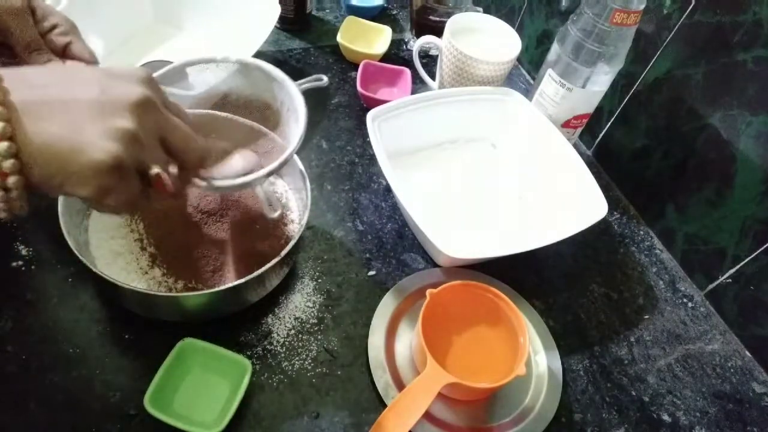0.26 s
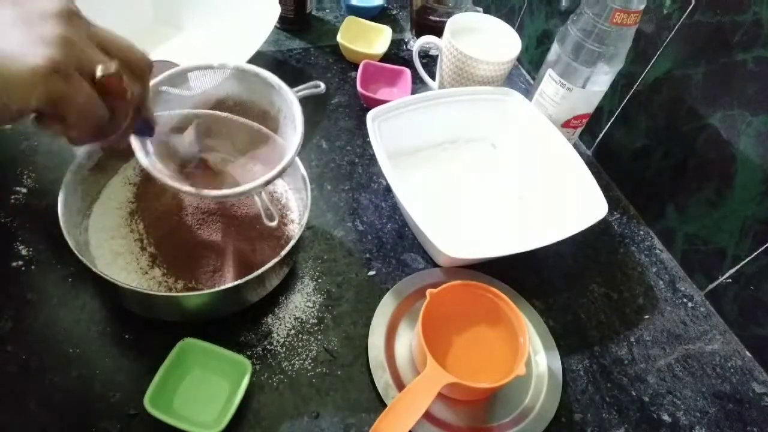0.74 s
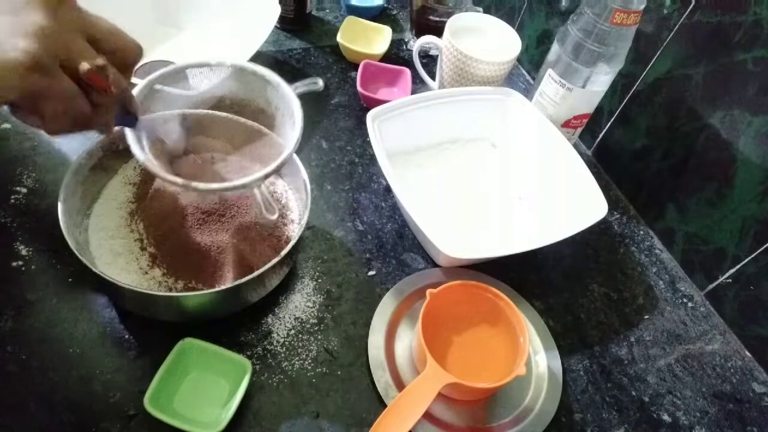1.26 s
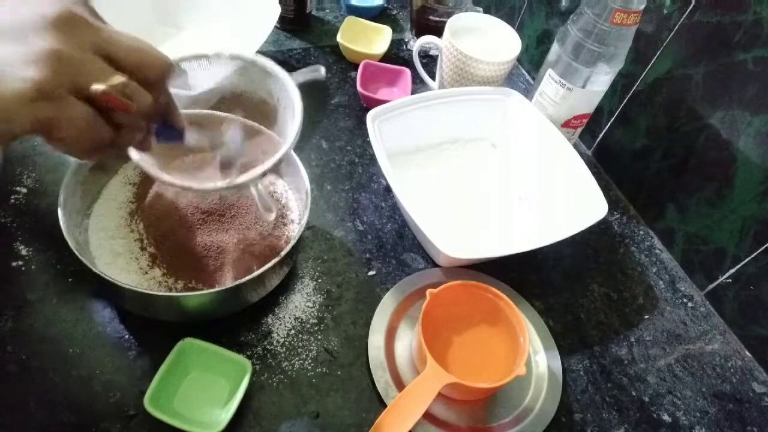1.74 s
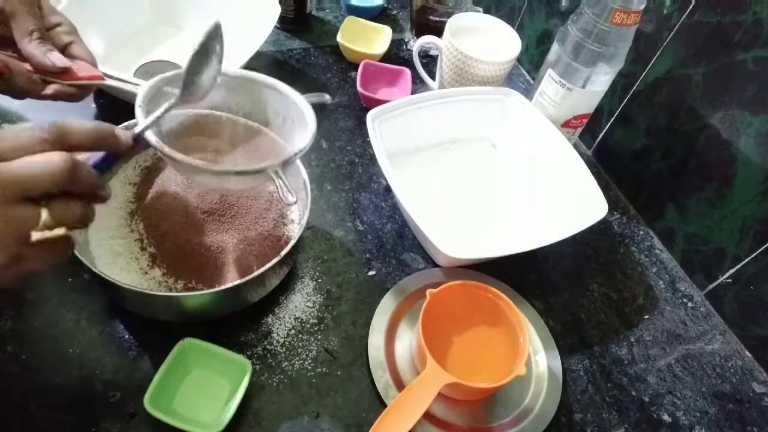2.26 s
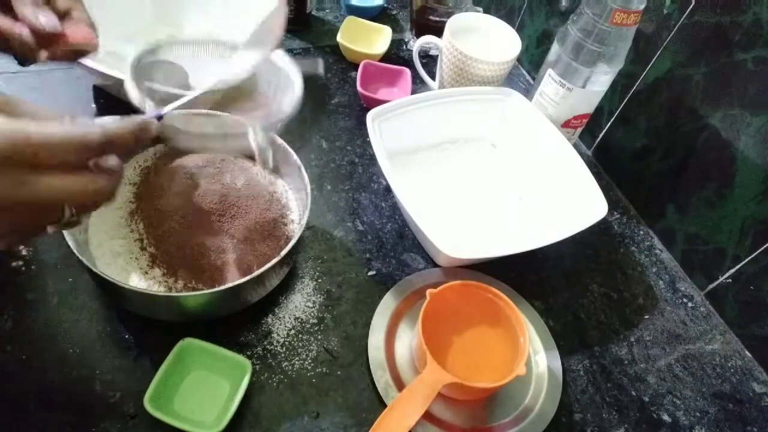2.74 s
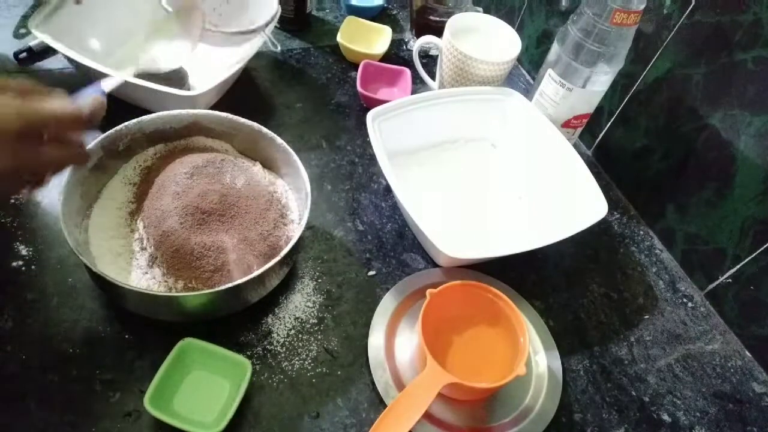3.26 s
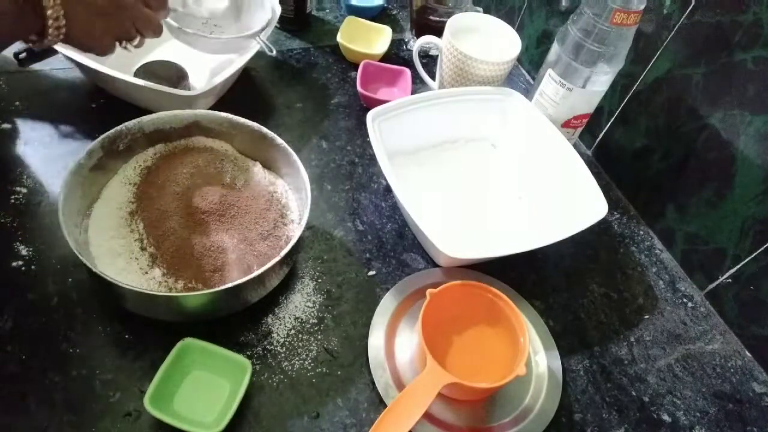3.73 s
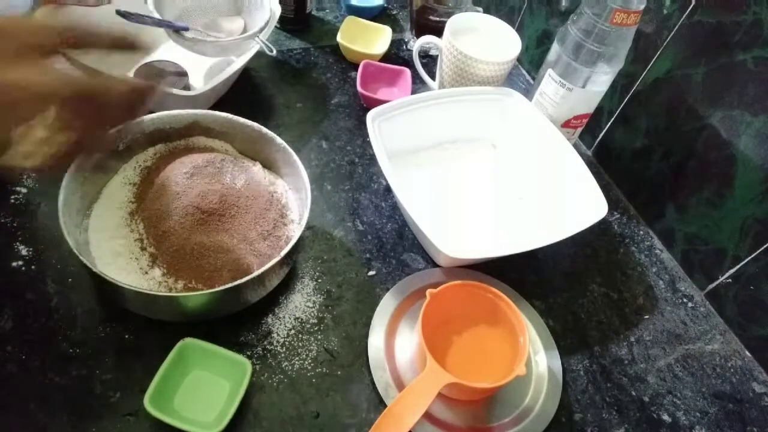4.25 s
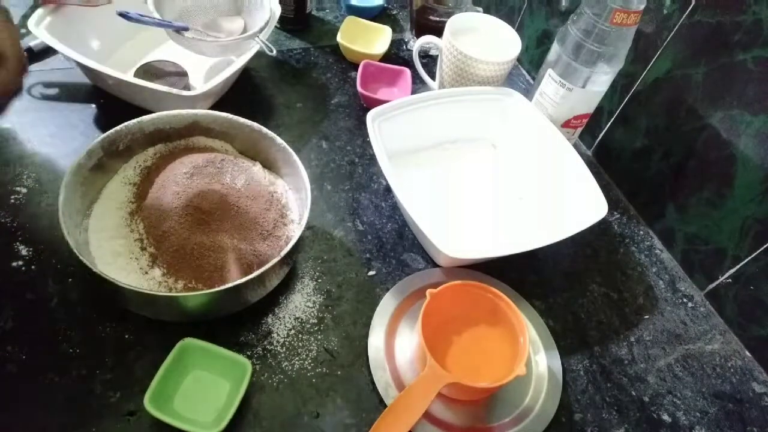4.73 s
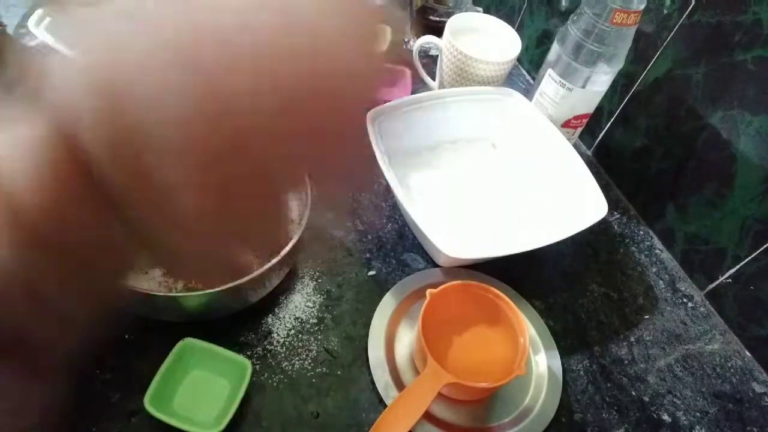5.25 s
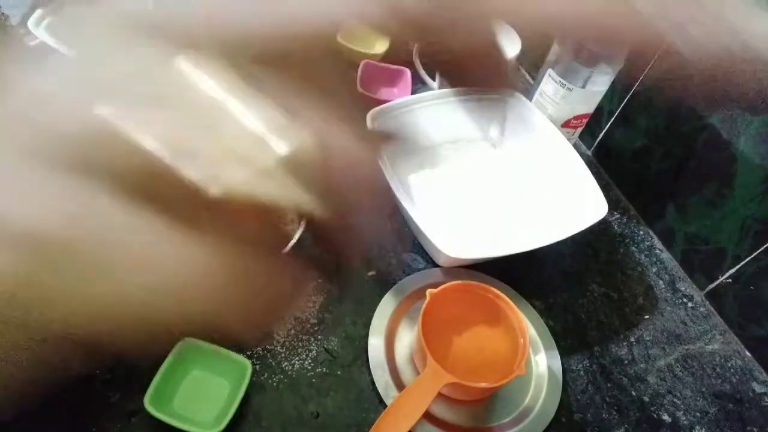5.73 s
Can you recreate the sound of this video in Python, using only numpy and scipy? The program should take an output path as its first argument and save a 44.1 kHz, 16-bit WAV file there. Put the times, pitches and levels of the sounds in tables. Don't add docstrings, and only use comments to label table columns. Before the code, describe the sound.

Close in a small tiled kitchen, a spoon rubs powder through a wire sieve in quick uneven gritty strokes, with a steel bowl humming faintly below. Four hard, bright metallic raps follow, each with a short hiss. After light clinks, sieve and spoon drop into a plastic tub with loud hollow knocks, then near silence with a soft scuff. The stereo phone microphone leans right.

```python
import sys
import numpy as np
from scipy import signal
from scipy.fft import rfft, irfft
from scipy.io import wavfile
from scipy.ndimage import uniform_filter1d

SR = 44100
rng = np.random.default_rng(int(sys.argv[2]) if len(sys.argv) > 2 else 0)


def field_ratio(decibels):
    return 10 ** (np.asarray(decibels, dtype=float) / 20)


def dump(signal):
    limited = np.clip(np.atleast_2d(signal).T, -1, 1)
    pcm = np.round(limited * 32767).astype(np.int16)
    wavfile.write(sys.argv[1], SR, pcm)


N = 264348
T = np.arange(N) / SR
LAG = 9


def level(x, db):
    return x * field_ratio(db) / np.sqrt(np.mean(x ** 2))


def colour(x, points):
    hz, db = np.transpose(points)
    log_grid = np.log(np.linspace(1, SR / 2, 2049))
    cepstrum = irfft(np.interp(log_grid, np.log(hz), db) * np.log(10) / 20)
    cepstrum[1:2048] *= 2
    cepstrum[2049:] = 0
    return signal.fftconvolve(x, irfft(np.exp(rfft(cepstrum))))[:N]


def ring(x, hz, width):
    return signal.lfilter(*signal.iirpeak(hz, hz / width, SR), x)


def body(x, modes):
    return sum((-1) ** k * field_ratio(db) * ring(x, hz, width) for k, (hz, width, db) in enumerate(modes))


def strike(s, db, hz, cycles):
    out, start = np.zeros(N), int(s * SR)
    t = T[:min(int(12 * cycles / hz * SR), N - start)] * hz
    decay, attack = np.exp(-t / cycles), 1 - np.exp(-t / 1.61)
    out[start:start + len(t)] = field_ratio(db) * np.sin(2 * np.pi * t) * decay * attack
    return out


def walk(rate):
    k = int(SR / rate)
    steps = np.repeat(rng.standard_normal(N // k + 1), k)
    return 1.4 * uniform_filter1d(uniform_filter1d(steps, k), k)[:N]


def grit(rate, spread_db, patchy_db):
    when, how_big, sign = rng.random((3, N))
    size = field_ratio(-spread_db * np.log(1 - how_big) + patchy_db * walk(250))
    return (when < rate / SR) * np.sign(sign - .5) * np.minimum(size, 30)


def play(rows, sag_db_s, fall_db_s, tail_db, tail_db_s, pan_db):
    swell_db = 30
    gain, share, t = 1e-9, 0, T[::16]
    for s, swell, hold, db, *share_db in rows:
        before = np.clip(s - t, 0, None) / max(swell, .001)
        held = np.clip(t - s, 0, max(hold, 0))
        after = np.clip(t - s - hold, 0, None)
        db = db - swell_db * before ** 1.422 - sag_db_s * held
        g = field_ratio(db - fall_db_s * after) + field_ratio(db + tail_db - tail_db_s * after)
        gain, share = gain + g, share + g * sum(share_db)
    smooth_gain = uniform_filter1d(np.interp(T, t, gain), size=24)
    return smooth_gain, np.interp(T, t, share / gain), np.full(N, 1. * pan_db)


def heard(x, pan_db, wet_db, t60, corner_hz):
    t = T[:SR // 4]
    echo = rng.standard_normal((2, len(t))) * np.exp(-np.log(1000) * t / t60)
    echo *= field_ratio(wet_db) / np.sqrt(np.sum(echo ** 2, axis=1, keepdims=True))
    scattered = x * np.array([walk(700), walk(700)])
    bright = signal.sosfilt(signal.butter(1, corner_hz, "high", fs=SR, output="sos"), scattered)
    wet = signal.fftconvolve(bright, echo, axes=1)[:, :N]
    return (np.array([np.roll(x, LAG), x]) + wet) * field_ratio(np.array([pan_db, -pan_db]) / 2)


# pitch_hz, width_hz, level_db
WIRE_MODES = [(4106, 230, 6), (4800, 170, -11), (6400, 340, 10.5), (7200, 210, -18.5), (10800, 370, -1)]
# pitch_hz, width_hz, level_db
BOWL_MODES = [(135, 52, 0.5), (220.3, 13, 6.5), (471, 30, 1.5), (693, 62, -4), (887, 88, -4),
              (986, 170, -7), (1340, 430, -14)]


def sieve(motions, dying, points, rate, wire_db, gain_db, bowl_gain_db, wet_db):
    gain, bowl_db, pan_db = play(motions, **dying)
    grains = grit(rate, spread_db=1.5, patchy_db=0.0)
    mesh = colour(grains, points)
    mesh = level(level(mesh, 0) + level(body(mesh, WIRE_MODES), wire_db), gain_db)
    bowl = body(level(grains, 0) * gain * field_ratio(bowl_db), BOWL_MODES) * field_ratio(bowl_gain_db)
    return heard(mesh * gain + bowl, pan_db, wet_db, t60=0.052, corner_hz=1540)


# full_force_s, swell_s, hold_s, hiss_db, bowl_share_db
STROKES = [(0.004, 0.018, 0.0084, -44.5, -16.5), (0.092, 0.087, 0.018, -41, -8),
           (0.39, 0.014, 0.041, -49, -10.5), (0.445, 0.078, 0.019, -36.5, -9),
           (0.654, 0.013, 0.0043, -66, -22), (0.702, .004, .005, -66, -20), (0.78, .03, .04, -62, -2.5),
           (0.868, 0.086, 0.016, -43, -12), (1.0, 0.026, 0.0086, -47.5, -12),
           (1.02, 0.048, 0.011, -39.5, -14.5), (1.132, 0.059, 0.015, -51.5, -11.5),
           (1.297, 0.052, 0.015, -43.5, -12), (1.396, 0.065, 0.022, -52, -12),
           (1.562, 0.058, 0.014, -37.5, -14), (1.615, .03, 0.014, -52, -14), (1.665, .03, .035, -48, -16),
           (1.826, 0.062, 0.016, -46, -13), (1.894, 0.0073, 0.0061, -60.5, -4)]
# freq_hz, density_db (per Hz)
MESH_COLOUR = [(700, -19.5), (1100, -21.5), (1700, -9.5), (2600, -4.5), (3300, -8.5), (4500, -5),
               (5800, -5), (6900, 1.5), (7700, -3.5), (8300, -15), (10000, -16), (10900, -13), (11800, -20),
               (15900, -26)]


def rubbing():
    rubbed = dict(sag_db_s=18, fall_db_s=509, tail_db=-35.5, tail_db_s=202.5, pan_db=-6.5)
    return sieve(STROKES, rubbed, MESH_COLOUR, 7000, wire_db=-19.5, gain_db=-4.5, bowl_gain_db=18, wet_db=5.0)


# full_force_s, swell_s, hold_s, hiss_db, bowl_share_db
SHAKES = [
    (2.187, .002, 0.08, -27, -16.5),
    (2.356, .002, 0.053, -27.5, -17.5),
    (2.512, .002, 0.038, -30.5, -18),
    (2.658, 0.0028, 0.033, -28.5, -18),
    (2.758, 0.0033, .004, -58.5, -1.5),
    (5.572, .012, .05, -68, 2),
    (5.805, .003, .02, -72, -10),
]
# freq_hz, density_db (per Hz)
RAP_COLOUR = [(410, -45.5), (700, -22), (1220, -20.5), (1720, -8.5), (1990, -9), (2390, -4), (3200, -7),
              (3960, -8.5), (7460, -2), (8300, -11.5), (15200, -23.5), (15900, -26.5), (16500, -45)]


def shivering():
    shaken = dict(sag_db_s=194, fall_db_s=481, tail_db=-47.5, tail_db_s=151, pan_db=-2.5)
    return sieve(SHAKES, shaken, RAP_COLOUR, 8000, wire_db=-11.5, gain_db=-3.5, bowl_gain_db=19, wet_db=5.5)


# full_force_s, swell_s, hold_s, clink_db, bowl_share_db
CLINKS = [
    (3.094, 0.0023, 0.04, -59.5, -4.5),
    (3.181, 0.0027, 0.038, -45.5, -11),
    (3.33, .003, 0.0031, -62.5, -10.5),
    (3.366, .004, .04, -68, -4),
    (3.451, 0.047, 0.028, -65, -15.5),
]
# freq_hz, density_db (per Hz)
FRAME_COLOUR = [(880, -19), (1500, -51.5), (1950, -22), (2360, 0), (2630, -3.5), (3700, 0.5), (4260, -21.5),
                (7390, -11), (8680, -36), (10200, -30), (15400, -31.5), (16500, -45.5)]


def clinking():
    knocked = dict(sag_db_s=251.5, fall_db_s=522.5, tail_db=-34.5, tail_db_s=200.5, pan_db=-5.5)
    return sieve(CLINKS, knocked, FRAME_COLOUR, 8000, wire_db=-21, gain_db=-2.0, bowl_gain_db=20.5, wet_db=7.0)


# start_s, peak_db, pitch_hz, left_minus_right_db, crack_share_db
TICKS = [(0.6524, -42, 6400, -8, -13), (0.7003, -45, 6700, -6, -3), (1.0934, -48, 6960, -12, 3),
         (1.289, -36, 6400, -8, -3), (1.3553, -46.5, 3040, -15, -13), (1.6092, -33, 6390, -9, -2),
         (1.6611, -37, 6360, -12, -9), (1.8961, -48, 3050, -19, -8), (2.1844, -15, 6230, -5.5, -2.5),
         (2.3555, -7.5, 7100, 0.5, -9.5), (2.5102, -16.5, 6460, -9.5, -2), (2.6559, -16.5, 6620, -9, -3),
         (2.7566, -32.5, 6600, -18, -10), (3.0954, -44, 3450, -13, -6.5), (3.1807, -30.5, 3650, -12, -6),
         (3.3298, -47, 3570, -12, -24), (3.3667, -43, 7200, -8, -3.5), (5.8027, -50.5, 4890, -11.5, -8)]


def spoon():
    cracks, pings, noise = 0, 0, rng.standard_normal(N)
    for s, db, hz, pan_db, crack_db in TICKS:
        pan = field_ratio(np.array([[pan_db], [-pan_db]]) / 2)
        t = np.clip(T - s, 0, 1)
        burst = np.exp(-t / 0.0017) * (1 - np.exp(-t / 0.00058)) * noise
        cracks = cracks + pan * field_ratio(db + crack_db) * burst
        pings = pings + pan * strike(s + 0.00065, db + 2.0, hz, cycles=6.9)
    coloured = np.array([colour(v, RAP_COLOUR) for v in cracks]) / np.std(colour(noise, RAP_COLOUR))
    left, right = pings + coloured
    return np.array([np.roll(left, LAG), right])


# full_force_s, swell_s, hold_s, drum_db, scuff_share_db
TUB_MOTIONS = [
    (3.434, 0.028, 0.03, -39.5, -23.5),
    (3.591, .002, 0.082, -21, -1.5),
    (3.669, .004, 0.077, -15.5, -12.5),
    (4.088, 0.01, 0.065, -19, -7),
    (4.19, 0.022, 0.02, -20.5, -10.5),
    (4.99, 0.02, 0.027, -51.5, -5),
    (5.055, 0.049, 0.038, -41.5, -0.5),
    (5.2, .08, 0.072, -67, -12.5),
]
# start_s, peak_db, edge_share_db, snap_share_db
BLOWS = [
    (3.432, -31, -29, 1.5),
    (3.591, -13.5, -12, 6.5),
    (3.669, -1, -11.5, 5.5),
    (3.684, -5.5, -19, 7),
    (4.09, -8, -11.5, 2.5),
    (4.104, -8, -24.5, -4),
    (4.195, -15, -25, 2.5),
    (4.989, -45.5, -6, 5.5),
]
# pitch_hz, width_hz, level_db
DRUM_MODES = [(256, 270, -14.5), (395, 34, -2.5), (530.4, 35, -1.5), (668, 17, 2), (743, 25, 4.5),
              (790.5, 60, 3), (915, 62, -5), (952, 32, -3), (1010, 39, -1.5), (1142, 79, -4), (1331, 58, 0),
              (1626, 130, -12)]
# freq_hz, density_db (per Hz)
SCUFF_COLOUR = [(1000, -29), (1700, 1), (2140, -7), (2530, -0.5), (2920, 1.5), (3180, -15), (3500, -4.5),
                (4750, -11), (6690, -11.5), (8320, -22.5), (15100, -33.5), (16000, -38.5), (16500, -72)]


def tub():
    gain, scuff_db, pan_db = play(TUB_MOTIONS, sag_db_s=70, fall_db_s=521.5, tail_db=-20.5, tail_db_s=177.5,
                                  pan_db=-0.9)
    rattle = grit(1500, spread_db=2.5, patchy_db=0.0)
    force = gain * rattle / np.std(body(rattle, DRUM_MODES))
    scuff = colour(grit(5000, spread_db=2.0, patchy_db=-1.0), SCUFF_COLOUR)
    edge = level(scuff, 0.63) * gain * field_ratio(scuff_db)
    snaps = 0
    for s, db, edge_db, snap_db in BLOWS:
        force[int((s + .002) * SR)] += field_ratio(db + 24.5)
        edge += strike(s + 0.0013, db + edge_db + 8.5, 4600, cycles=3.2)
        snaps = snaps - strike(s, db + snap_db + 3, 800, cycles=1.4)
    drum = body(force, DRUM_MODES) * field_ratio(-1.0)
    spread = heard(drum + edge, pan_db, wet_db=1.5, t60=0.085, corner_hz=1560)
    return spread + np.array([np.roll(snaps, LAG), snaps])


# full_force_s, swell_s, hold_s, level_db
BOOMS = [
    (3.72, 0.15, 0.07, -37.5),
    (4.16, 0.065, 0.081, -38.5),
    (4.3, 0.11, 0.054, -52.5),
]


def counter_boom():
    gain = play(BOOMS, sag_db_s=23, fall_db_s=346, tail_db=-30, tail_db_s=35, pan_db=0)[0]
    return field_ratio(2.5) * np.sin(2 * np.pi * 90.5 * T) * gain


# start_s, end_s, pitch_hz
TONES = [(1.7, 1.93, 3365), (1.9, 2.19, 3365), (1.98, 2.1, 3844), (3.367, 3.48, 7117), (3.367, 3.47, 5125),
         (3.367, 3.45, 11886), (3.367, 3.46, 11009), (3.367, 3.45, 9006), (3.367, 3.44, 3225),
         (4.0, 4.08, 5200), (2.78, 3.4, 1120), (2.9, 3.1, 690), (2.9, 3.1, 930), (5.18, 5.3, 1040),
         (4.66, 4.93, 530), (5.12, 5.3, 620), (4.35, 4.58, 485), (.45, .8, 490), (4.68, 4.85, 222),
         (5.6, 5.9, 220), (1.15, 1.5, 220), (3.672, 3.75, 543), (3.8, 4.07, 500), (4.0, 4.08, 3600)]
TONE_LEVELS = [-73, -79, -83, -66, -71, -80, -77, -77, -87, -82, -79.5, -72, -74, -80, -63.5, -67.5, -70,
               -69.5, -63.5, -65.5, -62, -19, -68, -84]
# start_s, peak_db, pitch_hz
THUDS = [(0.096, -72, 113), (0.431, -67, 144), (0.859, -45, 131), (1.016, -47, 116), (1.572, -50, 124),
         (2.183, -52.5, 137), (2.353, -44.5, 148), (2.518, -49, 148), (2.669, -61, 121.5),
         (3.187, -44.5, 147), (5.049, -45, 136), (5.088, -47, 114.3)]


def rings():
    out = sum(strike(s, db, hz, cycles=3.5) for s, db, hz in THUDS) * field_ratio(2.5)
    waver = walk(30)
    for (start, end, hz), db in zip(TONES, TONE_LEVELS):
        swell = np.sin(np.pi * np.clip((T - start) / (end - start), 0, 1) ** 0.93) ** 0.42
        loudness = field_ratio(db + 2.5 * np.roll(waver, 7 * hz))
        phase = 2 * np.pi * hz * T + .7 * np.roll(waver, 3 * hz)
        out = out + loudness * swell * np.sin(phase)
    return out * field_ratio(np.array([[-1.5], [1.5]]))


# freq_hz, density_db (per Hz)
AIR_COLOUR = [(45, -44), (72, -31), (92, 3.5), (250, -12), (500, -14), (900, -22), (1400, -26.5),
              (2000, -45), (4000, -62.5)]
# pitch_hz, width_hz, level_db
DRONES = [(92, 36, -1.5), (124, 14, -4.5), (218, 5.7, 4), (404, 20, -0.5), (493.4, 8.9, -16.5),
          (610, 9.2, -16.5)]


def kitchen():
    mid, left, right = (colour(rng.standard_normal(N), AIR_COLOUR) for _ in range(3))
    bass = signal.butter(1, 900, fs=SR, output="sos")
    air = signal.sosfilt(bass, mid) + np.array([v - signal.sosfilt(bass, v) for v in (left, right)])
    noise = rng.standard_normal(N)
    drones = sum(field_ratio(db + 3.0 * walk(4)) * level(ring(noise, hz, w), 0) for hz, w, db in DRONES)
    hum = level(air * field_ratio(2.0 * walk(5.5)), -1.0) + level(drones, -4.5)
    return hum * field_ratio(-66)


# freq_hz, density_db (per Hz)
HISS_COLOUR = [(800, -9.5), (1600, -0.5), (4000, 1.5), (7800, -5.5), (8200, -19.5), (16000, -26)]


def hiss():
    pair = np.array([colour(rng.standard_normal(N), HISS_COLOUR) * field_ratio(1.5 * walk(23)) for _ in range(2)])
    return level(pair, 3.2) * field_ratio(-87)


def gate(x):
    threshold_db, lag_s = -65, 0.087
    duck_s, duck = .03, .2
    treble = signal.sosfilt(signal.butter(2, 700, "high", fs=SR, output="sos"), x)
    power = np.mean(treble ** 2, axis=0)
    lag, ahead = int(lag_s * SR), int(duck_s * SR)

    def over(size, origin):
        mean = np.abs(uniform_filter1d(power, size, origin=origin))
        return np.clip(10 * np.log10(mean + 1e-12) - threshold_db, 0, None)

    jump = over(ahead, -(ahead // 2)) - over(ahead, (ahead - 1) // 2)
    dip_db = uniform_filter1d(duck * np.clip(jump, 0, None), size=200)
    return over(lag, (lag - 1) // 2), dip_db


def scene():
    near = rubbing() + shivering() + clinking() + spoon() + tub() + counter_boom() + rings()
    open_db, dip_db = gate(near)
    floor = kitchen() * field_ratio(0.21 * open_db) + hiss() * field_ratio(.5 * open_db)
    return near + floor * field_ratio(-dip_db)


def top_cut(x):
    return signal.sosfilt(signal.butter(12, 16820, fs=SR, output="sos"), x)


def record(dry):
    dry = signal.sosfilt(signal.butter(2, 55, "high", fs=SR, output="sos"), dry)
    dry = signal.sosfilt(signal.ellip(8, .2, 60, 16300, fs=SR, output="sos"), dry)
    return top_cut(np.clip(dry, -1, 1))


dry = scene()
out = record(dry)
dump(out)
```